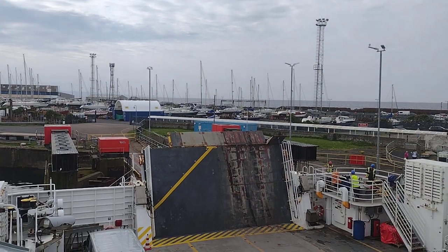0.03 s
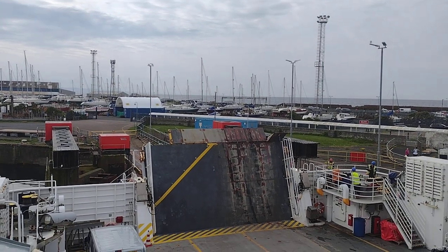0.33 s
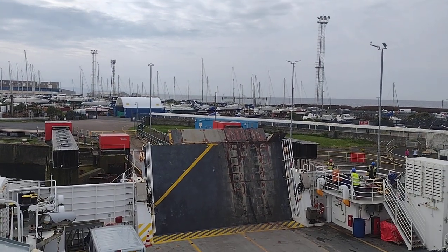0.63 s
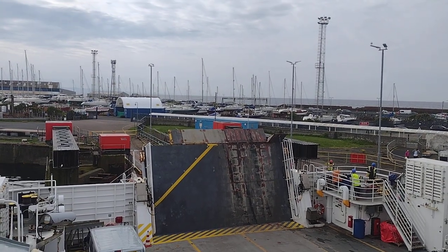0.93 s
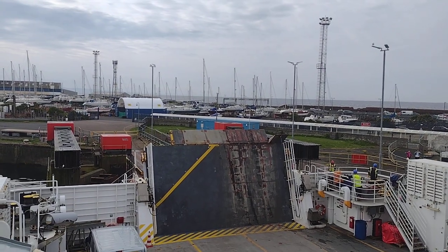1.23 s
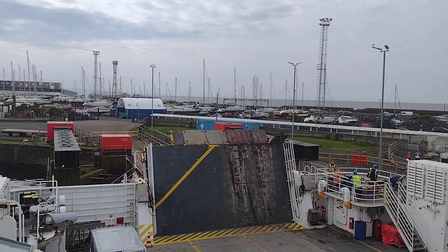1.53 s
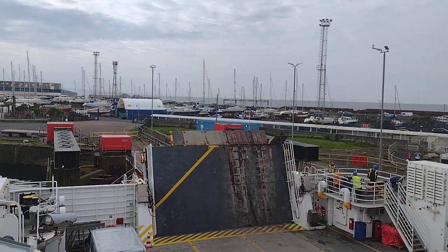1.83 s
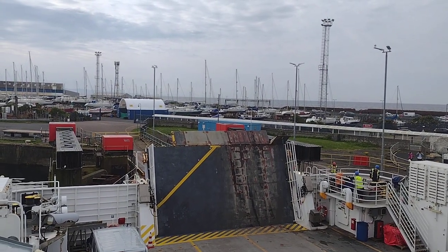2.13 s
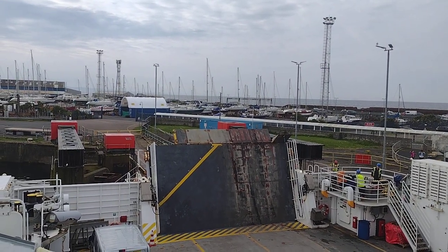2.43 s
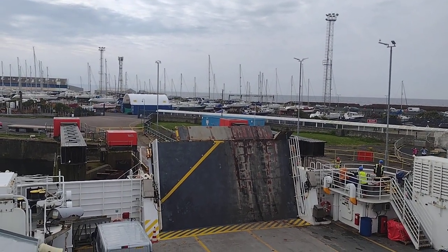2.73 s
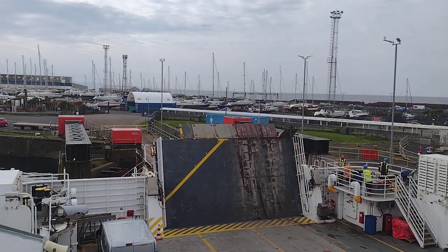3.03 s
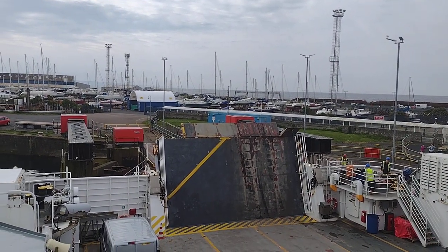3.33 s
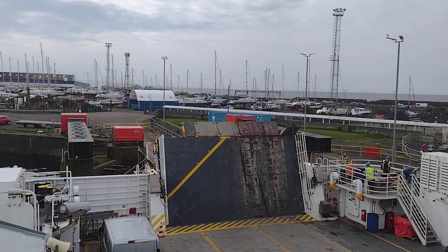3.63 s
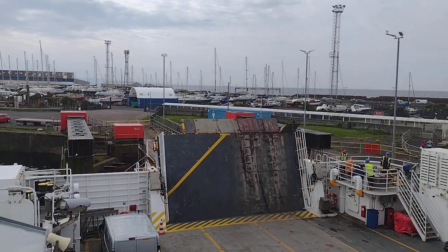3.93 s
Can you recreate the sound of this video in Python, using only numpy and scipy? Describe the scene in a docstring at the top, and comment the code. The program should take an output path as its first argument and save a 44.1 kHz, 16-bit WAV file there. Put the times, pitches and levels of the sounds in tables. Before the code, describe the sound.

A loud metallic clatter, like a dropped chain, over ship engine drone and gusting wind.

```python
"""Steel gear crashing on a windy ferry deck

Engines and ventilators drone while gusts of wind buffet the microphone.
Heavy steel gear, probably a chain or shackles, drags, crashes down, rattles and settles;
a small fitting then clinks twice. Each blow is a cluster of tiny strikes that sets the steel ringing.
The steel deck and its side walls throw the blows back."""
import sys
import numpy as np
from scipy import signal
from scipy.fft import rfft, irfft
from scipy.io import wavfile
from scipy.ndimage import uniform_filter1d, minimum_filter1d

SR = 44100
rng = np.random.default_rng(int(sys.argv[2]) if len(sys.argv) > 2 else 0)


def inscribe(sig):
    """Save sig as 16-bit PCM at rate SR to the path in sys.argv[1].

    A 1-D sig is mono; a 2-D sig holds one channel per row.
    Samples are clipped to [-1, 1] before scaling.
    """
    pcm = np.round(np.clip(np.atleast_2d(sig).T, -1, 1) * 32767)
    wavfile.write(sys.argv[1], SR, pcm.astype(np.int16))


N = 176400  # 4 seconds
TREBLE_LIMIT_HZ = 8120


def amp(db):
    """Turns decibels into a factor to multiply by."""
    return 10 ** (np.asarray(db) / 20)


def unit_power(x):
    """Scales a sound to an average power of 1."""
    return x / np.sqrt(np.mean(x ** 2) + 1e-20)


def unit_energy(x):
    """Scales a sound to a total energy of 1."""
    return x / np.sqrt(np.sum(x ** 2) + 1e-20)


def level_at(spectrum, hz):
    """Looks up a pitch's level in a table of pitch_hz, level_db."""
    pitches, levels = np.transpose(spectrum)
    return np.interp(np.log(hz + 1), np.log(pitches), levels)


def curve(rows, column=1):
    """Joins a table's points in time with straight lines."""
    rows = np.array(rows)
    return np.interp(np.arange(N) / SR, rows[:, 0], rows[:, column])


def colour(x, db_at):
    """Turns each pitch up or down by db_at(pitch) decibels."""
    return irfft(rfft(x) * amp(db_at(np.fft.rfftfreq(len(x), 1 / SR))), len(x))


def highpass(x, hz):
    """Turns down everything below hz."""
    return signal.sosfilt(signal.butter(2, hz, "high", fs=SR, output="sos"), x)


def drift(hz):
    """A random wobble, up to about hz times a second."""
    return unit_power(colour(rng.standard_normal(N), lambda f: -10 * np.log10(1 + (f / hz) ** 4)))


def add(mix, start_s, sound):
    """Mixes a sound in at start_s."""
    part = mix[max(round(start_s * SR), 0):][:len(sound)]
    part += sound[:len(part)]


# The tone colour of the engines and ventilators: pitch_hz, level_db
ROAR_SPECTRUM = [(20, -13), (45, -3), (70, 4), (110, -2), (190, -3), (270, -11), (450, -17), (700, -23),
                 (870, -14.5), (1200, -11.5), (1740, -12.5), (1950, -20), (2300, -40), (3200, -47),
                 (3900, -41), (4800, -43), (6700, -56), (7550, -44), (8200, -64)]


def roar():
    """Engines and ventilators make a steady noise whose resonances glide slowly up and down."""
    hz, frame_s, noise = signal.stft(rng.standard_normal(N), SR, nperseg=2048, noverlap=1536)
    hz = hz[:, None]
    # Small patches of pitch swell and fade, more so in the hiss.
    patches = uniform_filter1d(rng.standard_normal(noise.shape), size=9, axis=0)
    patches = unit_power(uniform_filter1d(patches, size=7, axis=1))
    patch_db = np.where(hz < 2000, 1.8, 3.2) * patches
    glide_hz = 144 * np.interp(frame_s, np.arange(N) / SR, drift(hz=0.99))
    spacing_hz = 210.2
    resonance_db = 3 * np.cos(2 * np.pi * (hz + glide_hz) / spacing_hz) * np.minimum(hz / 1000, 1)
    shaped = noise * amp(level_at(ROAR_SPECTRUM, hz) + resonance_db + patch_db)
    return amp(-32.5) * unit_power(signal.istft(shaped, nperseg=2048, noverlap=1536)[1][:N])


# The notes of the machinery: pitch_hz, level_db
HUM_TONES = [(70, -34), (344, -42), (1114, -57), (1243, -56), (1378, -53)]


def hum():
    """The machinery hums a few notes that waver in loudness and pitch."""
    out, t = np.zeros(N), np.arange(N) / SR
    for hz, db in HUM_TONES:
        waver = 1 + 0.7 * drift(hz=6)
        phase = 2 * np.pi * hz * t + 0.8 * drift(hz=6)
        out += amp(db) * unit_power(waver * np.sin(phase))
    return out


def eddy(hz):
    """The pressure swing of one eddy, a little whirl of air, centred in 60 ms."""
    width_cycles = 0.59
    cycles = hz * np.arange(-.03, .03, 1 / SR)
    offset = np.exp(-(np.pi * width_cycles) ** 2)  # makes push and pull cancel out
    return (np.cos(2 * np.pi * cycles) - offset) * np.exp(-(cycles / width_cycles) ** 2)


# How the wind rises and falls: time_s, strength_db, brightness_db
GUSTS = [(0.02, -14.5, -10), (0.09, -14.5, -15.5), (0.24, -11, -8.5), (0.56, -21.5, -23.5),
         (0.66, -38, -51), (0.7, -17.5, -27), (0.77, -21.5, -9.5), (0.84, -9.5, -10), (0.88, -15.5, -16),
         (1.0, -11.5, -5), (1.11, -11.5, -16.5), (1.14, -19.5, -11.5), (1.44, -20, -9), (1.5, -28, -21),
         (1.54, -22.5, -24), (1.62, -24.5, -24), (1.64, -26.5, -36), (1.72, -23, -28), (1.77, -20, -22.5),
         (1.81, -22.5, -36), (1.83, -7.5, -19), (1.96, -17.5, 0), (2.0, -30, -4.5), (2.03, -7.5, 1),
         (2.06, -27, -5), (2.09, -7.5, -7.5), (2.43, -14, -19.5), (2.45, -27, -9), (2.5, -21, -28.5),
         (2.6, -12.5, -13), (2.73, -7.5, -8), (2.85, -12.5, -7), (2.93, -8, -15.5), (3.09, -30.5, -9),
         (3.28, -41.5, -38.5), (3.42, -10, -19.5), (3.54, -15, -13.5), (3.71, -26.5, -25), (3.78, -46, 4),
         (3.87, -19.5, -32.5), (3.96, -20, -17.5), (3.98, -16, -24)]
# Eddies from big and low to small and high: pitch_hz, level_db
EDDY_SIZES = [(65, -3), (100, -5), (150, -5), (220, -7), (320, -10), (460, -16), (700, -21.5),
              (1200, -47.5), (2200, -53.5)]


def gusts():
    """Eddies of many sizes hit the microphone; fast gusts make the small ones stronger."""
    usual_brightness_db, eddies_per_cycle = -11.5, 1.3
    tilt_db_per_octave = 0.64 * (curve(GUSTS, column=2) - usual_brightness_db)
    out = np.zeros(N)
    for hz, db in EDDY_SIZES:
        arrivals = rng.random(N) < eddies_per_cycle * hz / SR
        strengths = 2 * rng.random(N) - 1
        swirl = signal.oaconvolve(strengths * arrivals, eddy(hz), "same")
        octaves = np.log2(np.clip(hz, 115, 585) / 179)
        out += unit_power(swirl) * amp(db + tilt_db_per_octave * octaves)
    return out * amp(1 + curve(GUSTS))


# Single hard thumps of wind: time_s, level_db, pitch_hz
WIND_THUMPS = [(.121, -20, 450), (.335, -8.5, 400), (.722, -8, 190), (.724, -17, 650), (.819, -10.5, 380),
               (.973, -4.5, 450), (1.344, -10.5, 473), (1.42, 1.5, 91), (1.428, -15.5, 500),
               (1.638, 0, 118), (1.75, -16, 470), (1.833, -20, 241), (2.024, -11, 540), (2.095, -5, 317),
               (2.143, -5, 450), (2.201, -6.5, 510), (2.622, -10, 420), (2.71, 2.5, 476),
               (2.834, -6.5, 490), (2.888, 0.5, 150), (3.335, -19, 250), (3.411, -10, 260),
               (3.443, -12.5, 420), (3.491, -11, 400), (3.501, 0.5, 70), (3.524, -10, 518),
               (3.941, -9, 358)]


def buffets():
    """One strong eddy hits the microphone, with a short wake of smaller ones."""
    out, t = np.zeros(N), np.arange(SR // 10) / SR
    wake_s, wake_db = 0.0041, -3
    wake_fade = np.maximum(1 - (t / wake_s) ** 2, 0)
    for time_s, db, hz in WIND_THUMPS:
        swing = eddy(hz)
        wake = signal.fftconvolve(rng.standard_normal(len(t)) * wake_fade, swing)
        start_s = time_s - len(swing) / 2 / SR
        add(out, start_s, -amp(db) * swing)
        add(out, start_s, amp(db + wake_db) * np.linalg.norm(swing) * unit_energy(wake))
    return out


# The tone colour of the heavy gear, both scraping and crashing: pitch_hz, level_db
GEAR_SPECTRUM = [(200, 3), (600, -7.5), (1000, 1), (1650, 7.5), (2100, -0.5), (3500, -7.5), (5000, -8.5),
                 (6400, -15), (7650, -16), (8100, -25)]
# How loudly the gear drags: time_s, level_db
DRAG_LEVELS = [(0.8, -83), (0.94, -60), (0.96, -76), (1.2, -79), (1.66, -67), (1.77, -54), (1.86, -48),
               (2.2, -46.5), (2.45, -49), (2.7, -57.5), (2.76, -81), (2.93, -88), (3.05, -58), (3.4, -68),
               (3.7, -68.5), (3.82, -80), (4, -56)]


def drag():
    """Steel scrapes over the deck with a fine, grainy hiss."""
    grains = rng.standard_normal(N) * np.exp(0.4 * rng.standard_normal(N))
    scrape = colour(grains, lambda hz: level_at(GEAR_SPECTRUM, hz) - 40 * (hz > TREBLE_LIMIT_HZ))
    return amp(curve(DRAG_LEVELS)) * unit_power(highpass(scrape, hz=2970))


def treble_octaves(hz):
    """How many octaves a pitch is above 3000 Hz, levelling off at both ends."""
    return np.log2(np.clip(hz, 700, 8000) / 3000)


def struck_steel(blows, notes, spectrum, clash_fade_s, ring_db):
    """Each blow is a quick cluster of strikes: a crack, a noisy clash and a few clear ringing notes."""
    strikes_per_s, crack_db, crack_fade_s = 400, 3, 0.012  # a fade time is the time to drop 60 dB
    out, t = np.zeros(N), np.arange(SR // 2) / SR
    pitches = np.fft.rfftfreq(len(t), 1 / SR)
    # Random resonances and gaps, about 35 Hz wide.
    ripple_db = 1.2 * np.interp(pitches / 35, np.arange(2000), unit_power(rng.standard_normal(2000)))
    body_db = level_at(spectrum, pitches) + ripple_db - 40 * (pitches > 9000)
    fade = amp(-60 * t / clash_fade_s) + amp(crack_db - 60 * t / crack_fade_s)
    for start_s, db, rattle_s, tilt in blows:
        phases = rng.random(len(notes))
        noise, strengths = rng.standard_normal((2, len(t)))
        hits = (rng.random(len(t)) < strikes_per_s / SR) & (t < rattle_s)
        strikes = unit_energy(strengths * hits)
        strikes[0] += 0.4  # the first contact
        ring = np.zeros(len(t))
        for (hz, note_db, fade_s), phase in zip(notes, phases):
            loudness = amp(note_db + tilt * treble_octaves(hz) - 60 * t / fade_s)
            ring += loudness * np.sin(2 * np.pi * (hz * t + phase))
        ring *= np.minimum(2 * t / rattle_s, 1)  # builds up during the rattle
        one_strike = colour(noise, lambda hz: body_db + tilt * treble_octaves(hz)) * fade
        clash = signal.fftconvolve(strikes, one_strike)[:len(t)]
        blow = unit_energy(clash) + amp(ring_db) * unit_energy(ring)
        add(out, start_s, amp(db) * unit_energy(blow))
    return out


# The blows of the heavy gear: start_s, level_db, rattle_s, tilt_db_per_octave
GEAR_BLOWS = [(1.742, -20, 0.022, 6.5), (1.883, 1.5, 0.007, 3), (1.888, -0.5, 0.055, 7),
              (1.915, -1, .015, 2), (1.936, -8, 0.015, -1), (1.922, -11, .012, 9.5),
              (1.965, -13, 0.0076, 3), (1.976, -7.5, .012, 10), (1.997, -3.5, .015, 1.5),
              (2.014, -1.5, 0.016, 3), (2.043, -0.5, 0.015, 0), (2.068, -6, 0.02, 1.5),
              (2.09, -6, 0.014, -0.5), (2.128, -10, 0.011, 4), (2.238, -6.5, 0.013, 1),
              (2.268, -9, 0.019, 0), (2.321, -8, 0.018, -0.5), (2.35, -10, 0.009, 0.5),
              (2.597, -17, 0.019, 2), (2.645, -10.5, 0.022, -10.5), (2.685, -10, 0.025, -4.5),
              (2.982, -33, 0.014, 8.5), (3.968, -20.5, 0.014, 4.5)]
# The notes it rings with: pitch_hz, level_db, fade_s
GEAR_NOTES = [(1090, -3, 0.3), (1314, 0, .35), (1530, 2, 0.35), (1680, 1, .4), (1795, 0, 0.4),
              (2267, 0, 0.3), (2466, -4, 0.3), (2616, -3, 0.25), (2833, -2, .3), (3050, -6, 0.35),
              (3360, -5, .35), (4540, -6, 0.3), (5134, -3, 0.25)]


def crashes():
    """Heavy steel lands and rattles, with more clash than ring."""
    return amp(7.5) * struck_steel(GEAR_BLOWS, GEAR_NOTES, GEAR_SPECTRUM, clash_fade_s=0.14, ring_db=-10)


# Steel sliding on steel: start_s, length_s, pitch_hz, width_hz, level_db
LINK_SQUEALS = [(1.871, 0.018, 5100, 596, -32.5), (1.915, 0.0073, 2530, 600, -24),
                (1.979, 0.079, 3530, 700, -35.5), (2.521, 0.035, 5790, 70, -47),
                (2.54, 0.023, 2170, 600, -38.5), (2.963, 0.056, 2900, 246, -59),
                (3.694, 0.2, 3070, 495, -62), (3.898, 0.11, 2870, 250, -60.5)]


def squeals():
    """The links stick and slip as they slide, making brief, rough notes."""
    out = np.zeros(N)
    for start_s, length_s, hz, width_hz, db in LINK_SQUEALS:
        noise = rng.standard_normal(SR // 2)
        note = colour(noise, lambda f: -20 * np.log10(1 + (2 * (f - hz) / width_hz) ** 2))
        span = round(length_s * SR)
        add(out, start_s, amp(db) * unit_power(note[:span] * signal.windows.tukey(span)))
    return out


# The fitting's blows, the first two heard as one: start_s, level_db, rattle_s, tilt_db_per_octave
FITTING_BLOWS = [(3.097, -4, .004, -3), (3.105, 0, 0.0097, 3.5), (3.193, -13, 0.005, 12)]
# The notes it rings with: pitch_hz, level_db, fade_s
FITTING_NOTES = [(2789, -16, 0.28), (3460, -11, 0.21), (4549, -12, .26), (5134, -11, .25), (5750, -13, .3),
                 (6320, 7, 0.22), (6514, -5, .3), (7700, -1, 0.12)]
# The tone colour of its bright clash: pitch_hz, level_db
FITTING_SPECTRUM = [(800, -4.5), (1600, 12), (2500, -2), (4000, -2.5), (5500, 1.5), (7500, 3),
                    (8300, -17.5)]


def clinks():
    """A small steel fitting is knocked and rings high and clear."""
    fitting = struck_steel(FITTING_BLOWS, FITTING_NOTES, FITTING_SPECTRUM, clash_fade_s=0.26, ring_db=-2.5)
    return amp(-1) * fitting


def with_deck_echoes(sound):
    """Adds scattered echoes from the steel deck and its side walls."""
    echoes_per_s, delay_s, fade_s, echo_db = 2000, 0.012, 0.82, -17
    t = np.arange(SR) / SR
    echoes = rng.standard_normal(SR) * (rng.random(SR) < echoes_per_s / SR)
    echoes = echoes * (t > delay_s) * amp(-60 * t / fade_s)
    return sound + amp(echo_db) * signal.fftconvolve(sound, unit_energy(echoes))[:N]


def scene():
    """Mixes steel, machinery and wind into one channel."""
    steel = with_deck_echoes(crashes() + clinks() + squeals()) + drag()
    machinery = roar() + hum()
    wind = highpass(gusts() + buffets(), hz=118)
    return (steel + machinery + wind)[None]


def record(dry):
    """Turns everything down in loud moments, holds back sharp peaks and cuts the highest treble."""
    threshold_db, duck_share, recover_db_per_s, peak_limit = -14.5, 0.6, 77, 0.7
    power_db = 10 * np.log10(abs(uniform_filter1d(dry[0] ** 2, size=900)) + 1e-12)
    fall_db = np.arange(N) * recover_db_per_s / SR
    held_db = np.maximum.accumulate(power_db + fall_db) - fall_db  # jumps up, sinks back steadily
    over_db = np.maximum(held_db - threshold_db, 0)
    ducked = dry[0] / amp(duck_share * uniform_filter1d(over_db, size=400))
    peak_gain = np.minimum(1, peak_limit / (abs(ducked) + 1e-9))
    limited = ducked * uniform_filter1d(minimum_filter1d(peak_gain, size=300), size=300)
    treble_cut = signal.firwin(151, TREBLE_LIMIT_HZ, window=("kaiser", 9), fs=SR)
    return signal.oaconvolve(limited, treble_cut, "same")[None]


dry = scene()
out = record(dry)
inscribe(out)
```